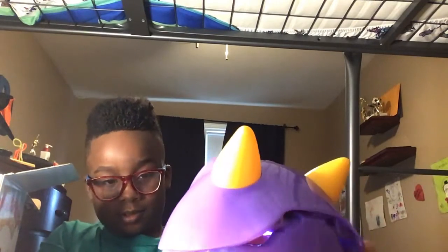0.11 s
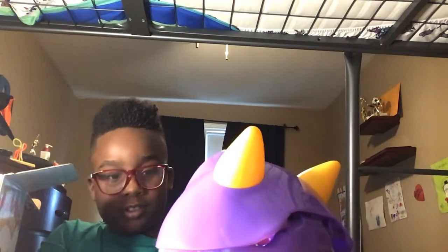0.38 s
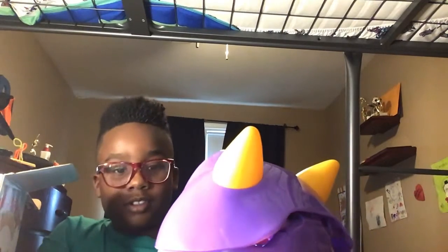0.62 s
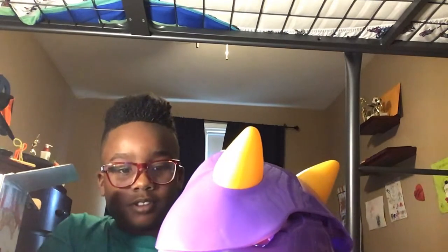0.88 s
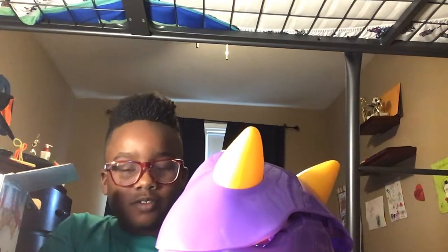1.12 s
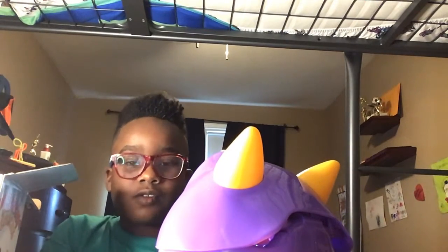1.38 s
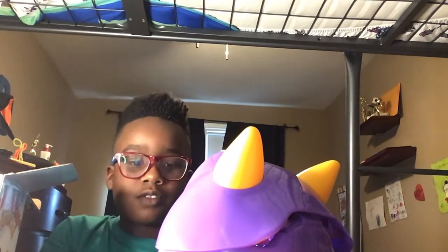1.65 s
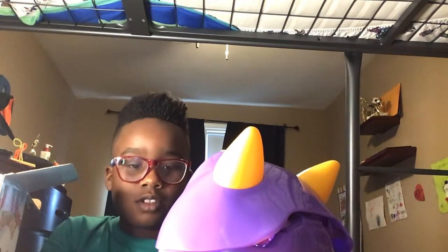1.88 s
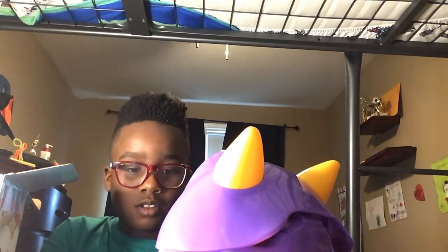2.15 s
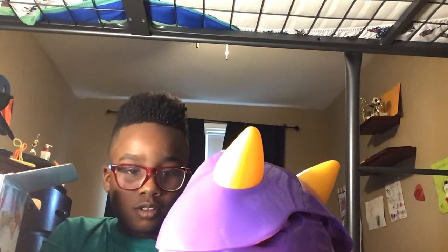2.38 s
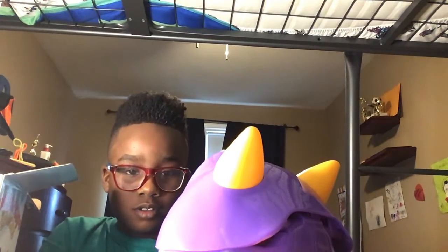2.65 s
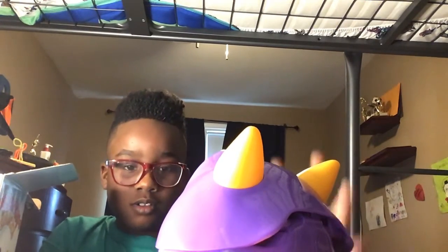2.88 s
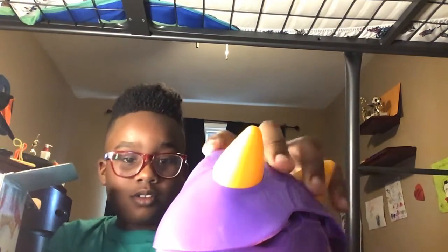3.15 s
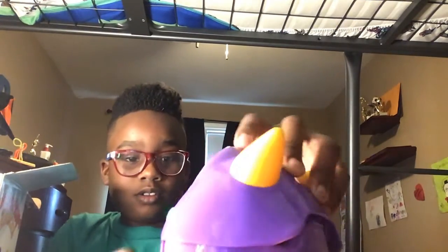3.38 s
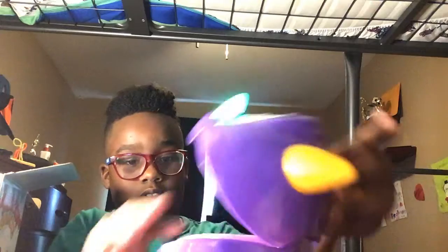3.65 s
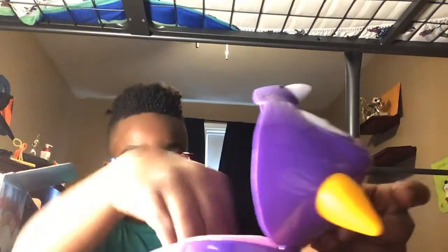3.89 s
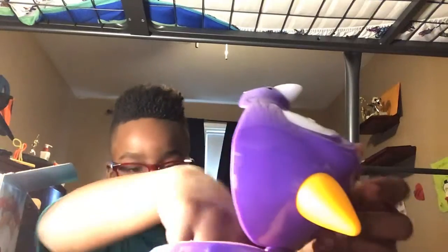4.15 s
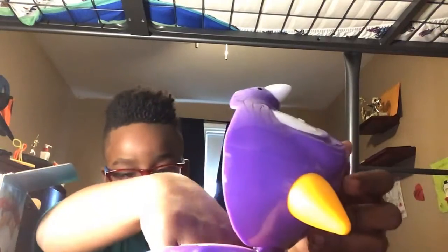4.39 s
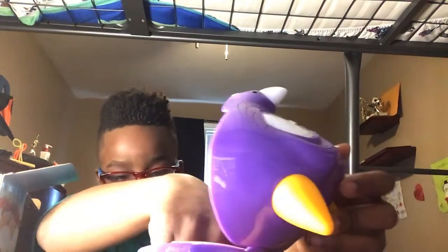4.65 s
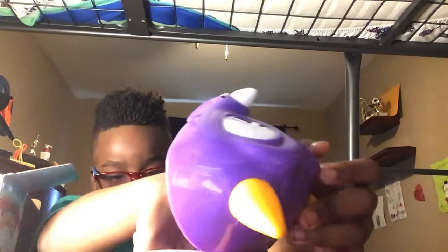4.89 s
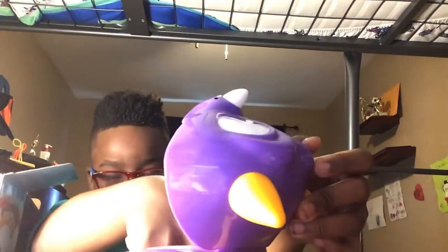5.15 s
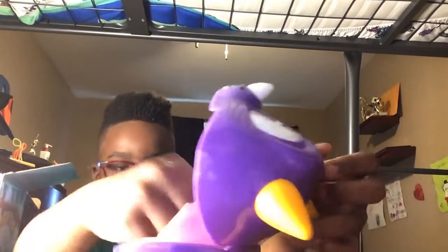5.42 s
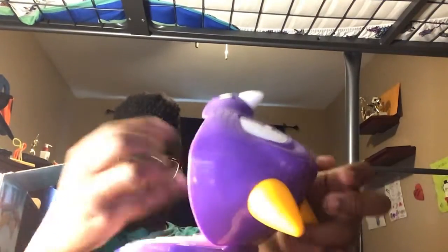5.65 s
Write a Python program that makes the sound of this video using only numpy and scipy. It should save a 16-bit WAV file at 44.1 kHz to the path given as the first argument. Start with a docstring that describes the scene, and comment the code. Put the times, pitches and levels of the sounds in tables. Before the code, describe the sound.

Close hollow plastic thuds, scrapes and clacks as a toy is shifted, left nearly still, then tipped open and searched by hand.

```python
"""Hollow plastic toy, searched by hand

Close on a laptop microphone in a quiet bedroom: a hollow plastic toy is shifted, opened and searched.
Skin slides on the shell as rough friction ringing its modes; parts click in short rough contacts.
Soft thuds are padded pushes on low modes; through the support the lows arrive after the highs.
Below lie shaped noise for the room's hum and the hiss of the electronics, with faint treble ticks
about ten times a second and a few thin blips."""
import sys
import numpy as np
from scipy import signal
from scipy.fft import rfft, irfft, next_fast_len
from scipy.io import wavfile

SR = 44100
rng = np.random.default_rng(int(sys.argv[2]) if len(sys.argv) > 2 else 0)


def makeup_ratio(level_db):
    """Linear amplitude ratio for a level in decibels (20 dB per factor of ten)."""
    decades = np.asarray(level_db, float) / 20
    return 10 ** decades


def inscribe(sig):
    """Save sig as 16-bit PCM at rate SR to the path in sys.argv[1].

    A 1-D sig is mono; a 2-D sig holds one channel per row.
    Samples are clipped to [-1, 1] before scaling.
    """
    pcm = np.round(np.clip(np.atleast_2d(sig).T, -1, 1) * 32767)
    wavfile.write(sys.argv[1], SR, pcm.astype(np.int16))


N = 255020

# modes of the shell and what it rests on, low, middle and high: mode_hz, width_hz, level_db
LOW_MODES = [(121.5, 21.6, 2.5), (208, 87, 1), (280, 81.3, 2.5), (384.5, 57.4, 0.5), (452.7, 55, -1.5),
             (567.5, 123, -5), (637, 98, -4), (754, 116, -12.5), (864, 99, -13.5)]
MID_MODES = [(980, 300, 1), (1320, 180, 2.5), (1820, 280, 0), (2130, 230, 3.5), (2650, 900, -6),
             (3400, 230, -4), (3930, 450, -9)]
HIGH_MODES = [(4360, 800, -2), (5140, 400, 1.5), (5680, 890, -2.5), (6430, 520, 0.5), (6820, 790, -1.5),
              (7600, 550, 0), (8150, 770, -3), (9320, 1700, -6), (11800, 8100, -17)]
BENDING_LAG_MS = 9.0  # lateness of 250 Hz behind the highest pitches


def rms_one(x):
    """Brings a sound to an rms of 1."""
    return x / np.sqrt(np.mean(x ** 2) + 1e-20)


def low_pass(x, hz, order=4):
    """Butterworth roll-off above hz."""
    return signal.sosfilt(signal.butter(order, hz, fs=SR, output="sos"), x)


def resonate(x, hz, width_hz):
    """One damped resonance, with gain 1 on top."""
    r = np.exp(-np.pi * width_hz / SR)
    feedback = [1, -2 * r * np.cos(2 * np.pi * hz / SR), r * r]
    return signal.lfilter([(1 - r * r) / 2, 0, (r * r - 1) / 2], feedback, x)


def body(x, modes, spread_db=0):
    """Modes in parallel with alternating signs, each strength varied by chance with spread_db."""
    out = 0
    for k, (hz, width_hz, db) in enumerate(modes):
        strength = makeup_ratio(db + spread_db * rng.standard_normal())
        out = out + (-1) ** k * strength * resonate(x, hz, width_hz)
    return out


def steep(x, modes):
    """Rolls off the sound above the top mode, as nothing rings far above it."""
    return low_pass(x, min(1.2 * modes[-1][0], 0.4 * SR), order=2)


def drift(rate_hz):
    """Slow chance wandering with an rms of 1: noise through two equal smoothing stages."""
    r = np.exp(-2 * np.pi * rate_hz / SR)
    wander = signal.lfilter([1], [1, -2 * r, r * r], rng.standard_normal(N + SR))
    return rms_one(wander[SR:])  # the first second only settles the filter


def add(out, s, peak_db, sound):
    """Lays a sound in at its time and peak level."""
    at = max(round(s * SR), 0)
    scaled = makeup_ratio(peak_db) * sound / np.max(np.abs(sound))
    out[at:at + len(sound)] += scaled[:N - at]


def room():
    """Steady hum and hiss as noise with a fixed spectrum; the part below about 600 Hz wavers."""
    # spectrum of the quiet bedroom and the electronics: pitch_hz, level_db
    room_spectrum = [(18, 3), (30, -11.5), (111, 0), (133, -2), (169, -3.5), (292, -17.5), (325, -7.5),
                     (400, -19), (730, -39), (855, -29.5), (1270, -30), (2700, -30.5), (6410, -36.5),
                     (9490, -32), (15600, -36.5)]
    level_db, waver_db, waver_hz = -65, 0.99, 4.3  # rms before the waver; depth and rate of the waver
    hz = np.maximum(np.arange(N // 2 + 1) * SR / N, 1)
    point_hz, point_db = np.transpose(room_spectrum)
    colour = makeup_ratio(np.interp(np.log(hz), np.log(point_hz), point_db))
    noise = rms_one(irfft(rfft(rng.standard_normal(N)) * colour, N))
    hum = low_pass(noise, 600.0, order=2)
    waver = makeup_ratio(waver_db * drift(waver_hz)) - 1
    return makeup_ratio(level_db) * (noise + hum * waver)


def electronics():
    """Ticks are impulses on a broad treble resonance; blips are short swelling and fading sine tones."""
    # ticks that come early: tick_number, counted from 0
    early_ticks = (0, 2, 3, 4, 5, 6, 8, 10)
    # thin treble blips: start_s, peak_db
    blip_table = [(1.0051, -75), (1.1762, -76), (1.2804, -74), (2.1101, -78), (2.2784, -77), (2.3675, -74),
                  (2.9784, -74)]
    first_s, every_s, early_s, jitter_s = 0.0645, 0.1, 0.0205, 0.0018
    tick_db, tick_spread_db = -55.5, 1.5  # mean peak level and its chance spread
    blip_hz, blip_ms = 9550, 16
    out, t = np.zeros(N), np.arange(SR // 20) / SR
    impulse = 1.0 * (t == 0)
    tick = resonate(resonate(impulse, 10000, 5200.0), 10000, 5200.0)
    for k, s in enumerate(np.arange(first_s, N / SR - 0.02, every_s)):
        start_s = s - early_s * (k in early_ticks) + rng.normal(0, jitter_s)
        add(out, start_s, tick_db + rng.normal(0, tick_spread_db), tick)
    envelope = np.sin(np.pi * np.minimum(1000 * t / blip_ms, 1))
    blip = np.sin(2 * np.pi * blip_hz * t) * envelope
    for s, peak_db in blip_table:
        add(out, s, peak_db, blip)
    return out


def pressure(scrape, swing):
    """Strokes and the resting grip add in power; each stroke swells to its peak, falling steeply outside.
    scrape blends from the rumble's level (0) to the scrape's (1); swing scales the rise and fall in dB."""
    # skin sliding on the shell: start_s, length_s, rumble_db,
    # scrape_db (against the rumble), peak_place (0-1 of the stroke, where pressure is highest)
    stroke_table = [(0.0, 0.22, -52, -7.5, 0), (0.235, 0.21, -50.5, -12.5, 0.82),
                    (0.527, 0.023, -62, -15, 0.2), (0.609, 0.039, -33.5, -21, 0.46),
                    (0.677, 0.051, -61.5, -15, .3), (.78, 0.042, -60.5, -14, 0.67),
                    (1.264, .18, -66.5, -8, 0.66), (1.522, 0.072, -58.5, -20, 0.8),
                    (2.255, 0.075, -58.5, -15, 0.67), (2.616, 0.17, -62, -14.5, 0.1),
                    (2.837, 0.025, -64, -7, 0.7), (3.084, 0.09, -44.5, -25.5, 0.07),
                    (3.166, 0.12, -50, -16, 0.24), (3.282, 0.14, -46.5, -14.5, 1),
                    (3.466, 0.056, -51, -21, 0.3), (3.541, 0.21, -50, -20.5, 0.24),
                    (3.633, 0.18, -42, -16.5, .75), (3.869, 0.091, -42, -17, 0.33),
                    (3.932, 0.15, -34.5, -17.5, 0.37), (4.077, 0.18, -49.5, -13.5, .1),
                    (4.26, 0.072, -37, -16, 0.3), (4.347, 0.091, -47.5, -15.5, 0.16),
                    (4.453, 0.052, -40, -25, 1), (4.515, 0.25, -40, -20.5, 0.36),
                    (4.75, 0.077, -47, -23, 0.47), (4.81, .17, -35.5, -16.5, 0.43),
                    (5.02, 0.069, -49, -18.5, 0.9), (5.065, 0.094, -38, -19.5, 0.76),
                    (5.15, 0.14, -48, -21, 0.2), (5.224, 0.6, -51.5, -15, 0), (5.46, .12, -46.5, -12, 0.56),
                    (5.59, 0.037, -43, -37, 0.7), (5.659, 0.1, -38.5, -27, 0.14)]
    # hands resting on the shell between strokes; the scrape counts against the rumble
    hold_db, hold_scrape_db, hold_waver_db, hold_waver_hz = -69.5, -19, 2.2, 6.7
    swell_db = 6  # rise from either end of a stroke to its peak, before swing
    attack_db_per_s, release_db_per_s = 903, 505  # slopes outside the stroke, before swing
    t = np.arange(N) / SR
    hold = hold_db + scrape * hold_scrape_db + hold_waver_db * drift(hold_waver_hz)
    power = makeup_ratio(hold) ** 2
    before_db = -swell_db - attack_db_per_s / 10  # a tenth of a second outside the stroke
    after_db = -swell_db - release_db_per_s / 10
    for s, length, rumble_db, scrape_db, peak in stroke_table:
        peak_s = s + length * np.clip(peak, 0.02, 0.98)
        times = [s - 0.1, s, peak_s, s + length, s + length + 0.1]
        near = slice(max(round(times[0] * SR), 0), round(times[-1] * SR))
        shape_db = np.interp(t[near], times, [before_db, -swell_db, 0, -swell_db, after_db])
        power[near] += makeup_ratio(rumble_db + scrape * scrape_db + swing * shape_db) ** 2
    return np.sqrt(power)


def slides():
    """Stick-slip grains on smooth friction drive the shell; the moving grip varies each mode's strength."""
    grains_per_s, grain_share = 1500.0, 0.6
    snags_per_s, snag_share = 70, 0.45  # skin catching and letting go
    hiss_db, hiss_swing = -7.5, 1.68  # fine hiss against its blend of rumble and scrape; swings more
    rumble_level = pressure(0, 1)
    scrape_level = pressure(0.98, 1)
    hiss_level = makeup_ratio(hiss_db) * pressure(0.81, hiss_swing)

    grain_size = makeup_ratio(1.03 * np.minimum(rng.exponential(size=N), 5))
    grains = (rng.random(N) < grains_per_s / SR) * grain_size * rng.standard_normal(N)
    friction = rng.standard_normal(N) + grain_share * rms_one(grains)
    friction = friction * makeup_ratio(1.2 * drift(45.0))

    snag_size = makeup_ratio(4 * np.minimum(rng.exponential(size=N), 3))
    snags = (rng.random(N) < snags_per_s / SR) * snag_size
    snag_envelope = signal.lfilter([1], [1, -np.exp(-1 / (0.001 * SR))], snags)  # 1 ms decay
    friction = friction + snag_share * rms_one(snag_envelope * rng.standard_normal(N))

    out = np.zeros(N)
    # broad: share of rustle against the singing modes
    for modes, level, broad in ((LOW_MODES, rumble_level, 1.5), (MID_MODES, scrape_level, 0.8),
                                (HIGH_MODES, hiss_level, 1.8)):
        # rubbing keeps the modes singing, so each stands out above the broad rustle
        sung = np.zeros(N)
        for k, (hz, width_hz, db) in enumerate(modes):
            ring = resonate(resonate(friction, hz, width_hz), hz, width_hz)
            sung += (-1) ** k * makeup_ratio(db + 3.5 * drift(3)) * ring
        rustle = steep(body(friction, modes), modes)
        out += level * rms_one(rms_one(sung) + broad * rms_one(rustle))
    return out


def thuds():
    """A padded push, smooth and a few milliseconds long, rings one low mode strongly, the others weakly."""
    # soft thuds: time_s, peak_db (before the support), ring_hz, decay_t60_s
    thud_table = [(0.345, -41, 282, 0.08), (0.374, -42, 153, 0.14), (0.482, -28.5, 306, 0.13),
                  (0.502, -31, 240, 0.03), (0.558, -36.5, 266, 0.087), (0.612, -33, 357, 0.02),
                  (0.621, -38, 290, 0.092), (0.642, -28.5, 254.6, 0.075), (0.7, -40.5, 247.5, 0.084),
                  (1.324, -44.5, 213, 0.09), (1.558, -54, 288, 0.083), (1.837, -54, 200, 0.13),
                  (2.068, -51.5, 455, 0.052), (2.289, -55, 323, 0.22), (2.35, -45, 324, 0.18),
                  (2.742, -36.5, 205, 0.06), (3.076, -42, 335, 0.084), (3.094, -54, 356, 0.071),
                  (3.142, -23.5, 363, 0.035), (3.159, -29.5, 232, 0.027), (3.175, -37.5, 133, 0.053),
                  (3.19, -36.5, 211.6, 0.22), (3.407, -43, 403, 0.17), (3.44, -41.5, 144, 0.11),
                  (3.55, -34.5, 245, 0.094), (3.756, -36.5, 263, 0.047), (3.893, -28.5, 280, 0.1),
                  (3.913, -61, 239, 0.064), (3.953, -28, 238, 0.025), (4.018, -40, 280, 0.048),
                  (4.074, -21.5, 283, 0.17), (4.237, -37, 255, 0.03), (4.274, -17, 251, 0.042),
                  (4.297, -28, 127, 0.054), (4.323, -28, 294, 0.042), (4.486, -48, 294, 0.11),
                  (4.505, -32.5, 120, 0.12), (4.636, -33.5, 235.5, 0.11), (4.727, -32.5, 305, 0.069),
                  (4.8, -35, 218, 0.13), (4.885, -26.5, 480, 0.15), (4.919, -33.5, 450, 0.16),
                  (4.943, -34, 418, 0.12), (5.08, -21, 368, 0.071), (5.141, -29.5, 271, 0.077),
                  (5.149, -30, 282, 0.083), (5.237, -34.5, 465, 0.045), (5.256, -32, 368, 0.047),
                  (5.595, -33, 133, 0.11), (5.668, -34.5, 307, 0.058), (5.716, -30.5, 367, 0.17),
                  (5.75, -32.5, 266, 0.19), (5.768, -37, 267, 0.12)]
    out, t = np.zeros(N), np.arange(SR // 4) / SR
    for s, peak_db, hz, t60 in thud_table:
        roughness = 1.64 * rng.standard_normal(len(t)) * np.sqrt(SR / 2000)
        push = low_pass((1 + roughness) * t * np.exp(-t / 0.001), 2.06 * hz)
        ring = resonate(push, hz, np.log(1000) / np.pi / t60)
        others = body(push, LOW_MODES, spread_db=5)
        # laid in early, since bending delays the lows
        add(out, s - BENDING_LAG_MS / 1000, peak_db, rms_one(ring) + 0.63 * rms_one(others))
    return out


def clicks():
    """A short rough contact rings one mode strongly; low and middle modes answer less the further
    their pitch lies from it, and the high modes answer at a level of their own."""
    # parts clicking: time_s, peak_db (before the support), ring_hz, treble_db (against the peak)
    click_table = [(0.263, -54, 2320, 2), (0.4743, -46.5, 2120, -8), (0.4907, -47.5, 2090, -4),
                   (0.6035, -35, 810, -8.5), (0.7986, -65, 834, -20), (1.5509, -53, 1900, -5),
                   (1.577, -62, 2070, -12), (1.829, -58, 970, -24), (2.0602, -56.5, 835, -13),
                   (2.2613, -55.5, 1740, -18), (2.3441, -59, 1110, -15), (2.7343, -54, 2120, -4.5),
                   (2.8453, -68, 1340, 5), (3.0677, -51.5, 1320, -14), (3.0884, -45.5, 1030, -23),
                   (3.102, -46, 1300, -12), (3.1251, -43.5, 1230, -24), (3.1414, -46.5, 795, 0.5),
                   (3.163, -63, 900, -11), (3.4036, -56, 800, 1), (3.4344, -72, 802, 16.5),
                   (3.462, -61, 3430, -9), (3.5014, -50, 2070, -10), (3.841, -61, 2050, 3),
                   (3.871, -70, 900, -10), (3.932, -58, 1370, 9), (4.0387, -34.5, 1870, -3.5),
                   (4.0616, -30.5, 1880, -2), (4.0744, -39, 905, -6), (4.166, -65, 2000, 10),
                   (4.2228, -53, 920, -21), (4.2638, -25.5, 3560, -10), (4.268, -34.5, 1750, 2),
                   (4.2796, -34.5, 780, -5), (4.3102, -58, 795, -18), (4.3176, -38, 1940, -31),
                   (4.438, -54, 900, -21), (4.4789, -37, 885, -32), (4.5224, -28, 2085, -18),
                   (4.5334, -29, 760, -12), (4.5424, -31, 770, -4.5), (4.5644, -36.5, 804, -16),
                   (4.6648, -42, 930, -25), (4.6932, -46, 2010, -5.5), (4.7221, -41, 920, -25),
                   (4.7536, -52, 3320, -20), (4.823, -45, 2200, -26), (4.8405, -38, 1950, -28),
                   (4.9578, -40.5, 890, -25), (5.0754, -24.5, 1830, -19.5), (5.1085, -38, 3420, -7),
                   (5.1278, -31, 846, -37), (5.1454, -42, 985, -15), (5.167, -55, 1100, -8),
                   (5.178, -50, 2000, -12), (5.2332, -30.5, 2110, -15), (5.254, -44, 900, -26),
                   (5.3035, -52, 2140, -17), (5.3364, -47, 1250, -6), (5.355, -50, 2100, -5),
                   (5.4306, -45.5, 870, -25), (5.472, -47, 1900, 0), (5.5048, -57, 980, 8),
                   (5.5118, -46.5, 1950, -8), (5.5257, -39, 1890, -10), (5.5664, -51.5, 1260, -0.5),
                   (5.597, -71, 862, 16), (5.6096, -48.5, 860, -14), (5.664, -42.5, 980, -21),
                   (5.704, -48, 940, -18), (5.749, -59, 923, -4.5)]
    contact_s = 0.0035  # decay time of the main contact
    out, t = np.zeros(N), np.arange(SR // 10) / SR
    onset = 1 - np.exp(-t / 0.00014)
    snap = 0.33 * np.exp(-t / 0.00027)
    settle = 0.13 * np.exp(-t / 0.014)
    force = onset * (np.exp(-t / contact_s) + snap + settle)
    for s, peak_db, hz, treble_db in click_table:
        contact = rng.standard_normal(len(t)) * force
        near = [(f, width, db - 1.7 * abs(np.log2(f / hz)))  # 1.7 dB weaker per octave
                for f, width, db in LOW_MODES[-2:] + MID_MODES]
        shell = body(contact, near, spread_db=2.5)
        ring = resonate(resonate(contact, hz, 307.0), hz, 307.0)
        add(out, s, peak_db, ring + 0.42 * low_pass(shell, 4100.0))
        add(out, s, peak_db + treble_db, body(contact, HIGH_MODES, spread_db=3.5))
    return out


def bending(x):
    """Bending waves run faster at high pitch: the lag falls as one over the root of frequency."""
    size = next_fast_len(N + SR)
    hz = np.arange(size // 2 + 1) * SR / size
    phase = -4 * np.pi * BENDING_LAG_MS / 1000 * np.sqrt(250 * hz)
    return irfft(rfft(x, size) * np.exp(1j * phase), size)[:N]


def scene():
    """Handling reaches the microphone through the support, which dulls the top."""
    lead = round(0.003 * SR)  # the clicks are timed at their arrival
    late_thuds = np.pad(thuds(), (lead, 0))[:N]  # offsets the lead taken below
    handling = slides() + clicks() + late_thuds
    carried = low_pass(bending(handling), 11500.0, order=2)
    arrived = np.pad(carried[lead:], (0, lead))
    return (arrived + room() + electronics())[None]


def band_limit(x):
    """A steep low-pass at the top of the band."""
    return signal.sosfilt(signal.butter(12, 15750, fs=SR, output="sos"), x)


def record(dry):
    """The microphone cuts the deep bass below 46 Hz."""
    bass_cut = signal.butter(6, 46, "high", fs=SR, output="sos")
    mix = signal.sosfilt(bass_cut, dry)
    return band_limit(mix)


dry = scene()
out = record(dry)
inscribe(out)
```